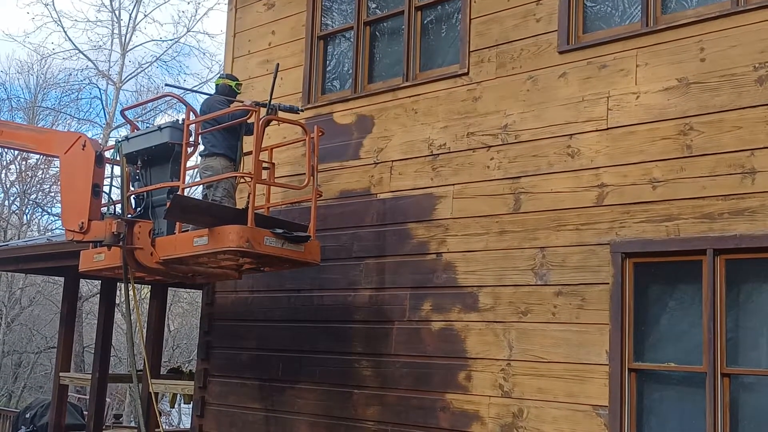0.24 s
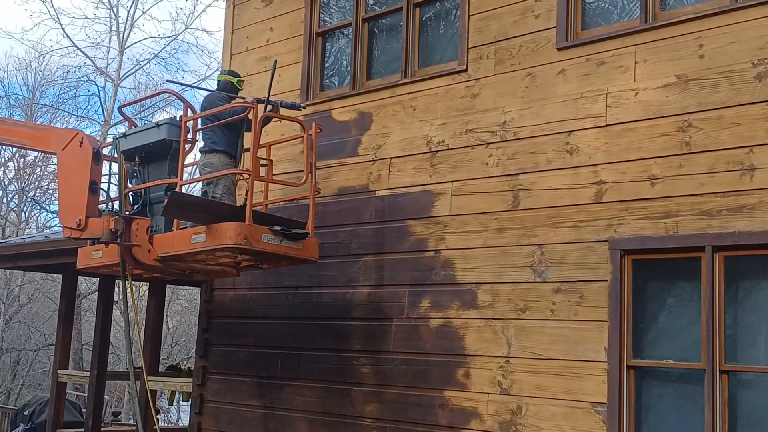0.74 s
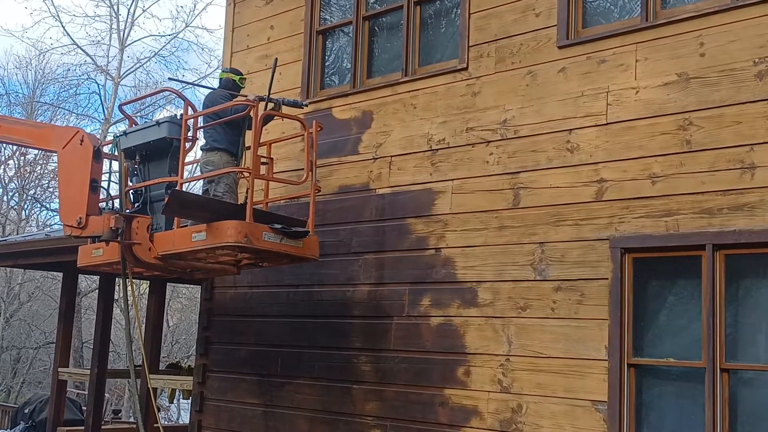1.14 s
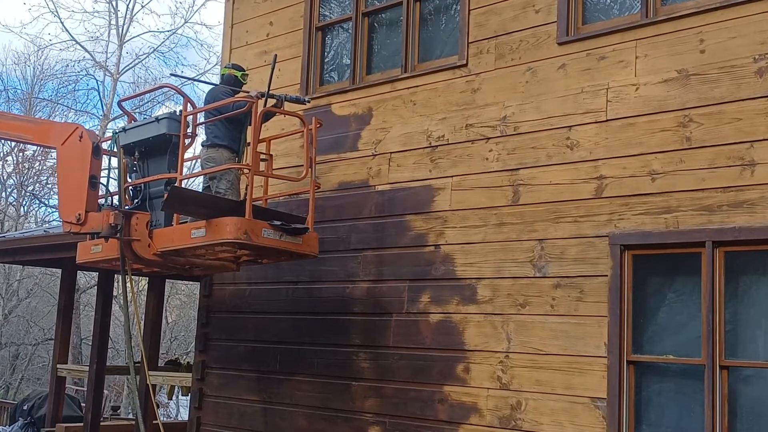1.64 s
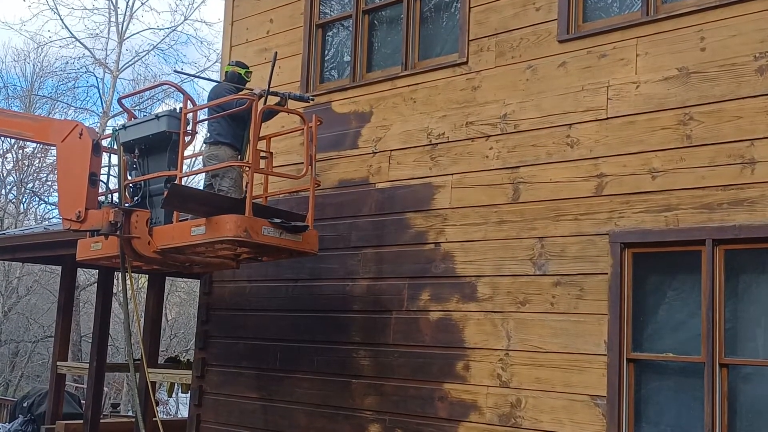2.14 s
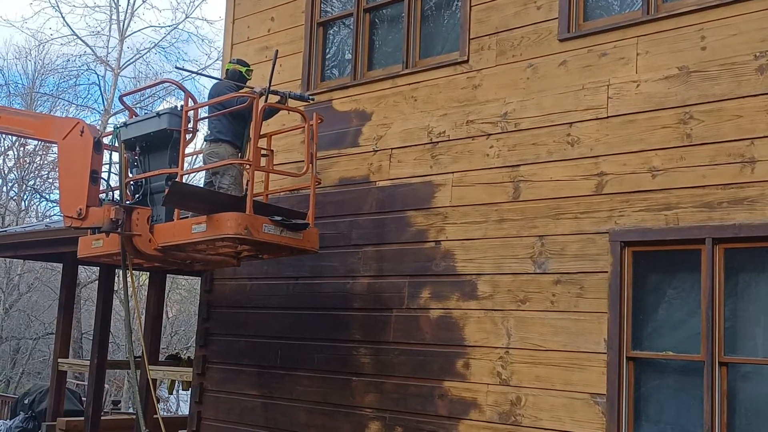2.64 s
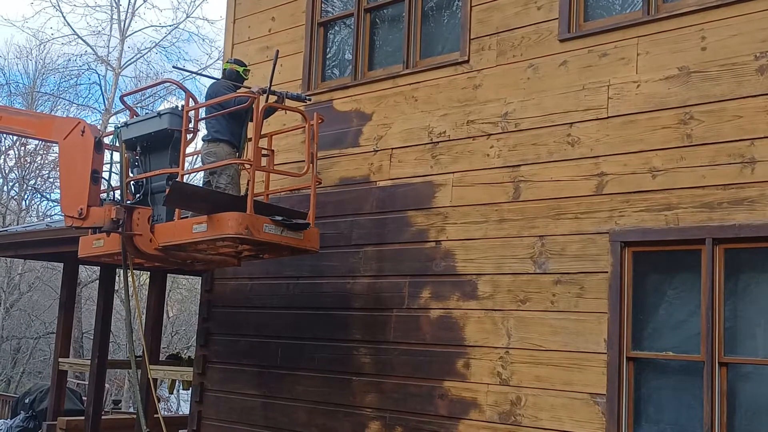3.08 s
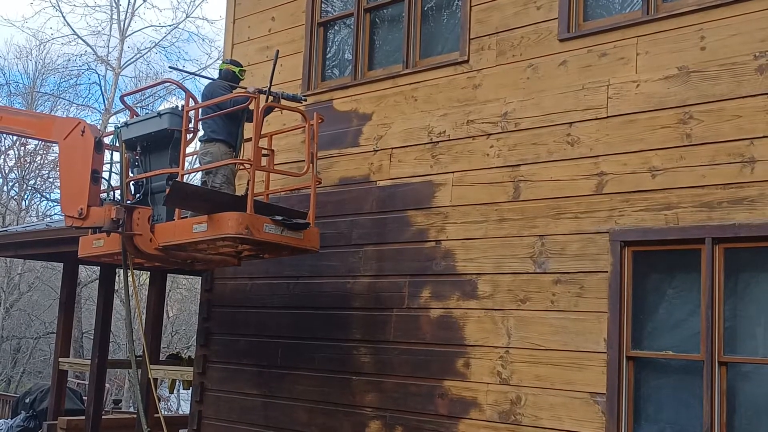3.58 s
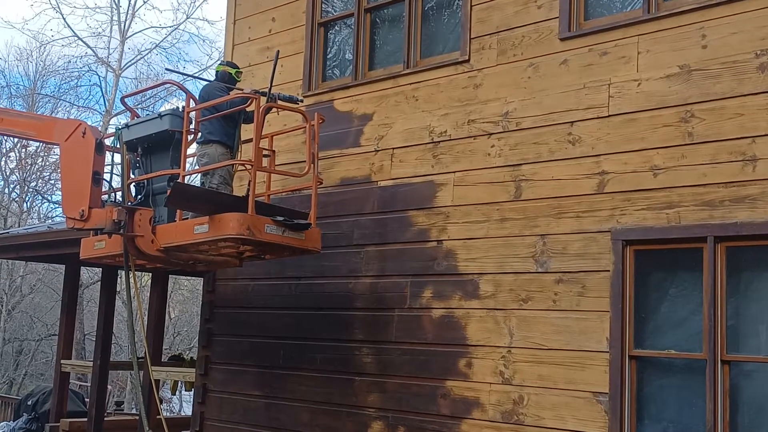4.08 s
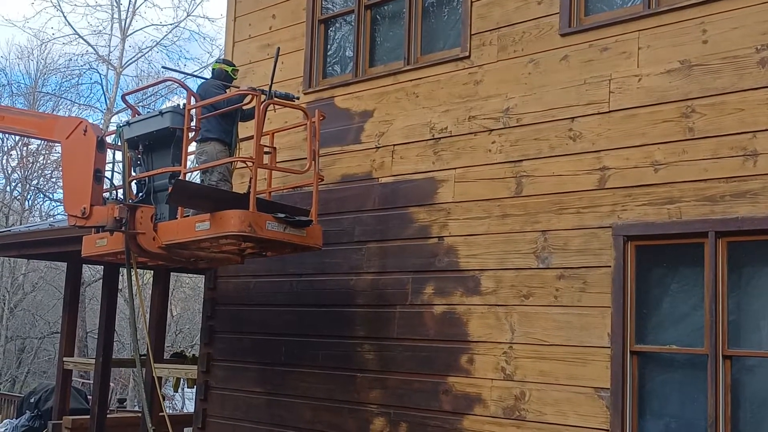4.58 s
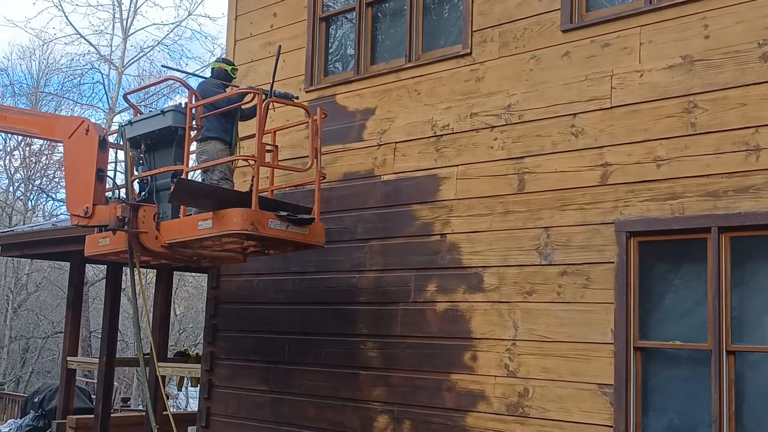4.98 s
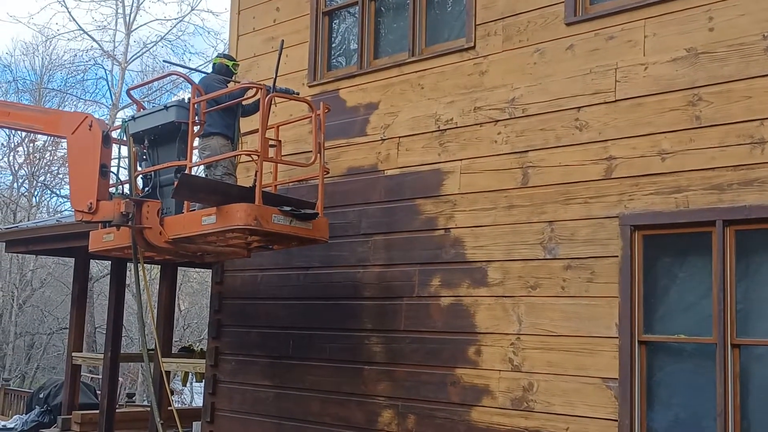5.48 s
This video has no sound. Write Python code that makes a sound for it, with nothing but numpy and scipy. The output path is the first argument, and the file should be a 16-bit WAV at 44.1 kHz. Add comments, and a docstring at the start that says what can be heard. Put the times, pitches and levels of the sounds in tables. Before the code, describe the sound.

From 0 to about 5.7 seconds a sandblasting nozzle roars and hisses without pause against the board wall of a timber house. The sound is already in full flow at the start and is still going at the end. It is a dense, bright rush of air and sand, strongest in the upper mids and treble, with thinner body below. Its level stays nearly steady but flutters quickly and finely with the sand feed, and countless tiny grain ticks give it a gritty sizzle. Close reflections lend a slightly hollow, phasey colour that drifts; a faint whistling edge comes forward around 1 to 2 seconds and again near 5. Underneath, a compressor and lift engine drone at constant speed, with a low hum near 160 hertz, a weaker higher tone and soft pulsing rumble. The stereo camera stands outdoors at moderate distance; the spray is wide and diffuse, with little audible echo.

```python
"""Sandblasting over two engines

A jet of air and sand roars and hisses against a timber wall: noise excites broad resonances in seven bands.
Their level surges with the sand feed, grains tick on the boards, and delayed copies comb the jet
as the nozzle moves. Behind it two engines, probably those of an air compressor and a boom lift,
drone as sums of shaft harmonics over pulsing low noise."""
import sys
import numpy as np
from scipy import signal
from scipy.fft import rfft, irfft, next_fast_len
from scipy.io import wavfile
from scipy.ndimage import map_coordinates

SR = 44100
rng = np.random.default_rng(int(sys.argv[2]) if len(sys.argv) > 2 else 0)


def wrap_up_sound(samples):
    """Save the sound to the file named by the first command line argument, as 16-bit audio."""
    columns = np.atleast_2d(samples).T
    # keep every value between -1 and 1, then stretch to whole-number steps
    tamed = np.clip(columns, -1, 1)
    steps = np.round(tamed * 32767).astype(np.int16)
    wavfile.write(sys.argv[1], SR, steps)


N = 252252

# Resonances of the jet's seven bands, lowest to highest.
# Each row: centre in Hz, width in Hz, relative left level in dB, relative right level in dB.
BODY = [(576, 162, -11.5, -10.5)]
ROAR = [(755, 88, -7, -6.5), (1003, 220, -4.5, -3.5)]
RUSH = [(1403, 360, -3.5, -2.5), (1673, 120, -3.5, -4.5)]
HOWL = [(1890, 230, -3, -7), (2107, 146, -1.5, -9.5), (2415, 300, -5.5, -6), (2660, 160, -5.5, -6.5),
        (2860, 246, -7, -2)]
HISS = [(3150, 310, -7, -1.9), (3743, 520, 0, 0.17), (4005, 66, -1, 1), (4265, 400, -2.5, 0.49),
        (4925, 610, -3.5, 1.3), (5404, 220, -1.5, 0.24)]
EDGE = [(5790, 250, -1, -7), (6270, 550, 0, -3), (7260, 1350, -5.5, -1.5), (8500, 890, -5, -7),
        (9690, 1500, -3, -5.5)]
FIZZ = [(11730, 1500, -17, -10), (12940, 1620, -0.5, -20), (14600, 1900, -6, -14)]
# Drift of the jet's colour, ahead of a fixed trim for each band.
# Each row: time in seconds, then the roar, rush, howl, hiss, edge and fizz levels in dB.
JET_LEVELS = [(0.0, -35.4, -32.1, -29.9, -23.6, -23.6, -21.6),
              (0.15, -35.5, -33.1, -30.4, -22.9, -23.2, -20.0),
              (0.45, -33.4, -33.0, -29.8, -22.1, -23.3, -20.6),
              (0.8, -34.7, -31.8, -29.2, -21.7, -23.9, -20.2),
              (1.15, -35.1, -33.5, -29.5, -21.9, -23.6, -20.6),
              (1.5, -34.5, -33.3, -29.6, -21.6, -23.9, -20.4),
              (2.1, -33.1, -33.1, -29.6, -21.0, -24.8, -19.7),
              (2.45, -33.9, -32.9, -30.2, -22.2, -24.4, -19.8),
              (2.75, -35.0, -32.9, -29.7, -21.8, -24.8, -20.2),
              (3.2, -35.1, -33.5, -30.4, -22.6, -24.8, -20.2),
              (3.7, -34.9, -32.9, -30.8, -21.9, -24.5, -20.8),
              (4.2, -34.6, -33.0, -30.4, -20.8, -24.2, -21.0),
              (4.6, -35.3, -33.3, -30.1, -20.8, -24.0, -21.0),
              (4.95, -34.9, -32.7, -30.5, -21.6, -24.1, -21.3),
              (5.27, -36.4, -33.4, -31.0, -20.7, -23.4, -19.8),
              (5.5, -36.8, -35.2, -31.9, -20.7, -23.8, -20.6),
              (5.72, -36.5, -34.6, -30.5, -21.0, -25.5, -20.6)]
# Arrival of the jet at the two microphone ports.
# Each row: frequency in Hz, direct share of the power from 0 to 1, left lead in radians.
PORTS = [(400, .68, .3), (560, .86, 0), (750, .82, .05), (1000, .94, .1), (1400, .87, .3), (1650, .72, .2),
         (1850, .88, .15), (2200, .25, -.1), (2420, .88, -.1), (2750, .3, 0), (3150, .58, 1.7),
         (3480, .7, 1.1), (3950, .9, .55), (4750, .6, .9), (5300, .65, 1.7), (5800, .45, 1.9),
         (6400, .3, .9), (7000, .2, .8), (8100, .55, 2.6), (9700, .52, 2.0), (10400, .08, 2),
         (12500, .29, 2.2), (14200, .2, 1.9), (14700, .05, 1)]
# Close reflections of the jet. Each row: left lag in ms, right lag in ms,
# relative left gain, relative right gain, share of the sway (a ratio).
ECHOES = [(1.324, 1.43, -0.107, -0.083, -0.657), (2.08, 2.042, 0.152, 0.112, -0.04),
          (2.358, 2.491, -0.076, -0.085, 0.157), (3.488, 3.613, -0.109, -0.069, 0.711),
          (3.769, 3.757, 0.247, 0.195, 1.0), (3.846, 3.901, -0.167, -0.083, 0.699),
          (4.058, 4.085, -0.13, -0.132, 0.789), (4.58, 4.58, -.04, -.05, .3), (4.943, 4.943, .035, .05, .3),
          (5.624, 5.624, -.01, -.045, .3), (7.982, 7.982, -.03, -.02, 1.0)]
# Sway of the reflections as the nozzle moves. Each row: time in seconds, added lag in ms for a share of 1.
SWAY = [(0, 0), (1.5, .033), (3, .034), (4.5, -.017), (5.72, -.075)]
# Drifting hollows and bright bands of the spray. Each row: time in seconds, centre in Hz, level in dB.
LOW_HOLLOW = [(0, 2950, -5), (1, 2880, -5.5), (2.2, 2850, -4.5), (3.5, 3050, -2), (4.7, 2730, -1.5),
              (5.4, 2720, -4), (5.72, 2680, -5)]
MID_HOLLOW = [(0, 2230, 1), (3.6, 2230, -3), (4.5, 2160, -0.5), (5.1, 2120, -6), (5.72, 2100, 0)]
WHISTLE = [(0, 1880, -0.5), (0.6, 1880, -0.5), (1.05, 1860, 1.4), (1.9, 1845, 2.2), (2.35, 1855, 0.2),
           (2.9, 1850, 1.6), (3.4, 1860, -1.4), (4.1, 1870, -1.8), (4.7, 1910, 1.3), (5.2, 1920, 1.3),
           (5.72, 1920, 0.3)]
HIGH_HOLLOW = [(0, 7950, -5), (1, 8050, -5), (2.2, 8000, -0.5), (3.5, 8429, -2), (4.7, 8485, 0.5),
               (5.4, 8408, -0.5), (5.72, 8300, 4)]
SIZZLE = [(0, 11200, -1.2), (2.5, 11200, -0.3), (4.5, 11300, 0.2), (5.72, 11200, 2)]
SHEEN = [(0, 7100, 5), (1, 7065, 3), (2.2, 6540, -0.7), (3.5, 6240, -2.5), (4.7, 6040, -0.5),
         (5.4, 6000, 3.5), (5.72, 5860, 3)]
# Shaft orders of each engine.
# Each row: multiple of the shaft rate, left rms level in dB, right rms level in dB, left lead in radians.
COMPRESSOR_ORDERS = [(2, -52, -50, 1.4), (3.5, -52, -53, 0.58), (4, -34.5, -35.5, 0.16),
                     (4.5, -70, -56, 0.0), (5, -58, -61, 0.048), (6, -54, -48.5, 1.4),
                     (7.5, -62, -71, 0.0038), (8, -50.5, -50.5, 1.13), (12, -56, -63, 1.1)]
LIFT_ORDERS = [(2, -57.5, -59.5, .2), (2.24, -58.5, -59.5, 0), (3, -59.5, -60.5, -.1),
               (4.5, -59.5, -55.5, .2), (8, -42.2, -43, .45), (19, -57.5, -57.5, .1)]
# Spectrum of exhaust and fan noise. Each row: frequency in Hz, relative density in dB per Hz.
RUMBLE = [(20, -20), (38, -28), (55, -20), (72, -4), (100, -1), (140, 1.5), (190, -2), (235, 3), (300, 0),
          (390, -15), (490, -3.5), (600, -12), (720, -8), (1500, -51)]
# Narrow dips and slight lifts of the camera's housing.
# Each row: centre in Hz, width in Hz, left level in dB, right level in dB.
SHADOWS = [(8700, 220, 0.5, -2.5), (10300, 420, 1.5, -2.5), (10530, 360, -3, -0.5)]

# Sand feed: weights in dB of two random curves, ahead of each band's share, and their knots per second
SURGE_DB, SURGE_RATE = 0.25, 17
CLUMP_DB, CLUMP_RATE = 0.68, 34
# Sand grains: ticks per second at each port, rms level in dB before the surge, spread of sizes in dB
GRIT_RATE, GRIT_DB, GRIT_SPREAD_DB = 990, -34, 3.3
ECHO_GAIN = 1.25  # common factor on all reflections
COMPRESSOR_HZ, LIFT_HZ = 40.87, 33.24  # mean shaft rates, turns per second
TOP_HZ = 15820  # upper band limit


def sandblaster():
    """Turbulent jet noise is a sum of resonant bands; one fluctuating sand feed modulates them all."""
    roar_db, rush_db, howl_db, hiss_db, edge_db, fizz_db = curves(JET_LEVELS)
    surge_db = SURGE_DB * wobble(SURGE_RATE) + CLUMP_DB * wobble(CLUMP_RATE)
    # each band: drift + trim + its share of the surge, some with a flutter of their own
    body = amp(-42.5 + 0.5 * surge_db) * turbulence(BODY)  # no drift in the lowest band
    roar = amp(roar_db - 2.5 + 0.53 * surge_db) * turbulence(ROAR)
    rush = amp(rush_db + 0.87 + 0.58 * surge_db) * turbulence(RUSH)
    howl = amp(howl_db + 0.68 + 0.97 * surge_db + 0.27 * wobble(17.0)) * turbulence(HOWL)
    hiss = amp(hiss_db - 0.5 + 0.65 * surge_db) * turbulence(HISS)
    edge = amp(edge_db - 0.2 + 0.6 * surge_db + 0.59 * wobble(50)) * turbulence(EDGE)
    fizz = amp(fizz_db - 0.36 + 0.58 * surge_db + 0.35 * wobble(55)) * turbulence(FIZZ)
    jet = body + roar + rush + howl + hiss + edge + fizz

    spray = reflected(jet, dull_hz=16000)
    spray = spray + amp(GRIT_DB + surge_db) * grit()
    spray = swirled(spray, depth_db=0.85, width_hz=301, rate=18)  # quick eddies
    spray = swirled(spray, depth_db=1.53, width_hz=48, rate=2.2)  # narrow, lingering streaks
    spray = aimed(spray, LOW_HOLLOW, width_hz=205)
    spray = aimed(spray, MID_HOLLOW, width_hz=86)
    spray = aimed(spray, WHISTLE, width_hz=67)
    spray = aimed(spray, HIGH_HOLLOW, width_hz=580)
    spray = aimed(spray, SIZZLE, width_hz=800)
    return aimed(spray, SHEEN, width_hz=330)


def turbulence(modes):
    """Broadband noise excites resonances; the coherent direct part and scattered parts add in power; rms 1."""
    m = next_fast_len(N + 8192)
    hz = np.fft.rfftfreq(m, 1 / SR)
    colour = resonances(modes, hz)
    share, lead = along(PORTS, hz)
    share = np.clip(share, 0, 1)
    noise = rfft(rng.standard_normal((3, m)))
    direct = np.sqrt(share) * noise[0] * np.exp(.5j * np.array([lead, -lead]))
    scattered = np.sqrt(1 - share) * noise[1:]  # independent at each port
    pair = irfft(colour * (direct + scattered), m)[:, :N]
    return pair / np.std(pair)


def resonances(modes, hz):
    """Resonances driven by noise add in power: the gain at each port is the root of the summed squares."""
    power = 0
    for centre, width, left, right in modes:
        peak = amp([[left], [right]]) / (1 + 2 * ((hz - centre) / width) ** 2)
        power = power + peak ** 2
    return np.sqrt(power)


def grit():
    """Impacts of single grains are short damped oscillations at random instants, coloured by FIZZ; rms 1."""
    t = np.arange(24) / SR
    out = np.zeros((2, N + len(t)))
    for port in range(2):
        when, size, pitch = rng.random((int(GRIT_RATE * N / SR), 3)).T
        size_db = -GRIT_SPREAD_DB * np.log(1 - .99 * size)  # many small grains, few large
        cycles = (6000 + 9000 * pitch[:, None]) * t  # 6 to 15 kHz
        ticks = amp(size_db)[:, None] * np.sin(2 * np.pi * cycles) * np.exp(-cycles)
        places = (when * N).astype(int)[:, None] + np.arange(len(t))
        out[port] = np.bincount(places.ravel(), ticks.ravel(), N + len(t))
    out = filtered(out, lambda hz: resonances(FIZZ, hz))
    return out / np.std(out)


def reflected(x, dull_hz):
    """Interference with dulled copies a few ms late forms a comb, which slides as the lags change."""
    sway_ms, = curves(SWAY)
    dull = filtered(x, lambda hz: 1 / (1 + (hz / dull_hz) ** 2) ** 2)
    out = x.copy()
    for *lags_ms, left_gain, right_gain, sway_share in ECHOES:
        for port, gain in enumerate((left_gain, right_gain)):
            when = np.arange(N) - (lags_ms[port] + sway_share * sway_ms) * SR / 1000
            out[port] += ECHO_GAIN * gain * map_coordinates(dull[port], [when], order=3)
    return out


def swirled(x, depth_db, width_hz, rate):
    """A random gain field over frequency and time makes patches of the spectrum swell and fade."""
    hz, t, z = signal.stft(x, SR, nperseg=1024)
    knots = rng.standard_normal((256, 256))
    places = np.meshgrid(hz / width_hz, t * rate, indexing="ij")
    field = map_coordinates(knots, places, mode="mirror")
    calm = 1 / (1 + hz[:, None] / 12000)  # the highest hiss stays smoother
    return signal.istft(z * amp(depth_db * calm * field), nperseg=1024)[1][:, :N]


def aimed(x, track, width_hz):
    """A moving bell-shaped gain hollows or brightens one band of the spray as the nozzle is aimed."""
    hz, t, z = signal.stft(x, SR, nperseg=1024)
    s, centre, level_db = np.transpose(track)
    band = np.exp(-((hz[:, None] - np.interp(t, s, centre)) / width_hz) ** 2)
    return signal.istft(z * amp(band * np.interp(t, s, level_db)), nperseg=1024)[1][:, :N]


def engines():
    """Periodic machinery radiates shaft harmonics; its low noise is modulated twice a compressor turn."""
    turns = shaft(COMPRESSOR_HZ, wander_hz=0.036, rate=4.8)
    lift_turns = shaft(LIFT_HZ, wander_hz=0.045, rate=2.75)
    puffs = 1 + 0.29 * np.cos(2 * np.pi * 2 * turns)
    ports = [(60, .4, 0), (300, 0.44, 0.53)]  # Hz, likeness of the ports 0-1, left lead in radians
    rumble = puffs * stereo_noise(lambda hz: amp(along(RUMBLE, hz)[0]), ports)
    compressor = drone(turns, COMPRESSOR_ORDERS, waver_db=0.5)
    lift = drone(lift_turns, LIFT_ORDERS, waver_db=0.9)
    return compressor + lift + amp(-41.5) * rumble * amp([[.6], [-.6]])  # rumble slightly to the left


def shaft(speed_hz, wander_hz, rate):
    """Phase is the integral of rate: turns made by a shaft whose speed wanders slightly about its mean."""
    return np.cumsum(speed_hz + wander_hz * wobble(rate)) / SR


def drone(turns, orders, waver_db):
    """Tones locked to a shaft sit at multiples of its rate; the weaker ones waver more in level."""
    loudest = max(row[1] for row in orders)
    out = np.zeros((2, N))
    for multiple, left, right, lead in orders:
        phase = 2 * np.pi * (multiple * turns + rng.random())
        waver = waver_db * np.sqrt(1 + loudest - left) * wobble(7)
        tone = np.array([amp(left) * np.sin(phase + lead), amp(right) * np.sin(phase)])
        out += np.sqrt(2) * amp(waver) * tone
    return out


def stereo_noise(colour, ports):
    """Sum and difference of two independent noises give partly coherent, phase-shifted ports; rms 1."""
    m = next_fast_len(N + 8192)
    hz = np.fft.rfftfreq(m, 1 / SR)
    alike, lead = along(ports, hz)
    turn = np.arccos(np.clip(alike, 0, 1)) / 2
    shared, apart = rfft(rng.standard_normal((2, m))) * [np.cos(turn), np.sin(turn)]
    pair = np.array([shared + apart, shared - apart]) * np.exp(.5j * np.array([lead, -lead]))
    pair = irfft(pair * colour(hz), m)[:, :N]
    return pair / np.std(pair)


def shadowed(hz):
    """Diffraction by the camera's housing is a sum, in dB, of narrow bell-shaped gains at each port."""
    level_db = 0
    for centre, width, left, right in SHADOWS:
        level_db = level_db + np.array([[left], [right]]) * np.exp(-((hz - centre) / width) ** 2)
    return amp(level_db)


def amp(db):
    """An amplitude ratio is ten to the power of a twentieth of its decibels."""
    return 10 ** (np.asarray(db) / 20)


def along(points, hz):
    """Spectral columns of (Hz, ..) points are interpolated on a logarithmic frequency axis."""
    f, *cols = np.transpose(points)
    return [np.interp(np.log(hz + 1), np.log(f + 1), c) for c in cols]


def curves(rows):
    """Columns of (seconds, ..) rows are interpolated linearly to one value per sample."""
    s, *cols = np.transpose(rows)
    return [np.interp(np.arange(N) / SR, s, c) for c in cols]


def wobble(rate):
    """Smooth interpolation of random knots, rate of them a second, gives a slow random curve."""
    knots = rng.standard_normal(int(N * rate / SR) + 4)
    return map_coordinates(knots, [np.arange(N) * rate / SR])


def filtered(x, response):
    """Linear filtering multiplies the spectrum by a response of frequency."""
    m = next_fast_len(N + 8192)
    return irfft(rfft(x, m) * response(np.fft.rfftfreq(m, 1 / SR)), m)[..., :N]


def scene():
    """Sound pressures superpose: the jet over the engines."""
    return sandblaster() + engines()


def record(dry):
    """The camera acts as a linear filter: housing dips, a bass roll-off at 42 Hz and a sharp upper limit."""
    def response(hz):
        bass_cut = hz ** 2 / np.hypot(hz ** 2, 42 ** 2)
        return shadowed(hz) * (hz < TOP_HZ) * bass_cut
    return filtered(dry, response)


dry = scene()
out = record(dry)
wrap_up_sound(out)
```